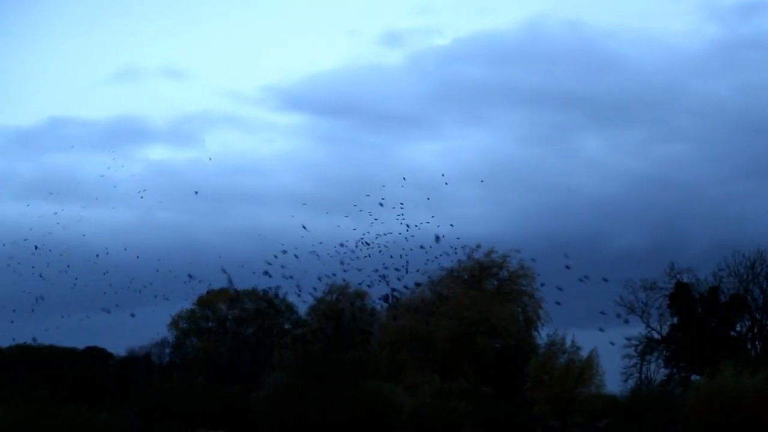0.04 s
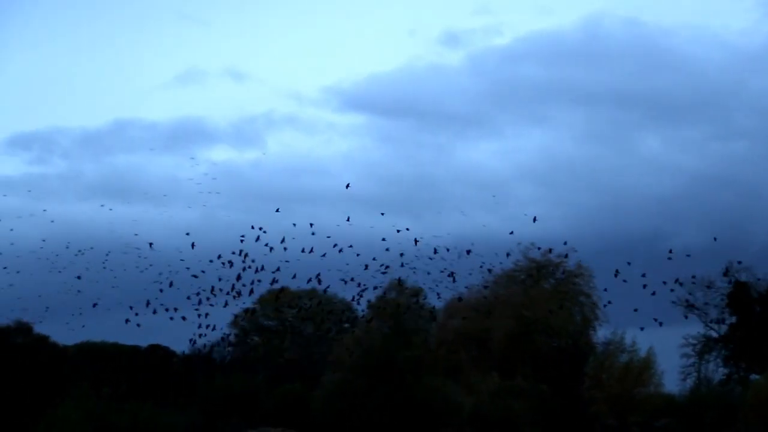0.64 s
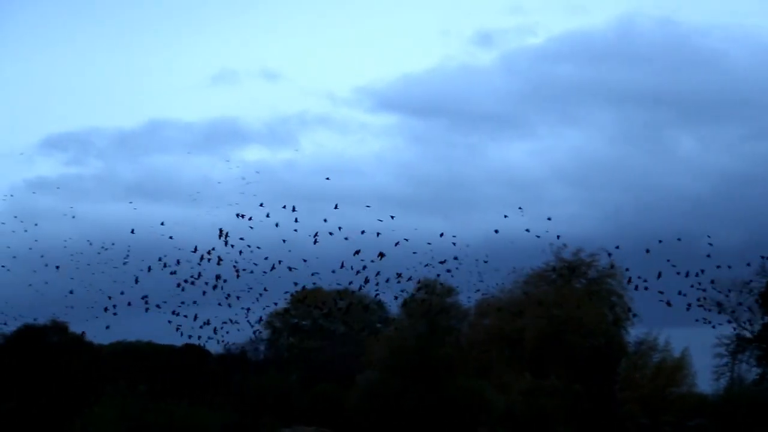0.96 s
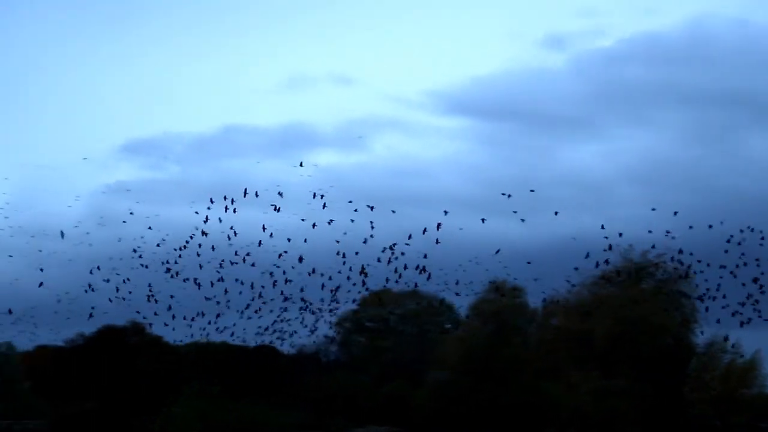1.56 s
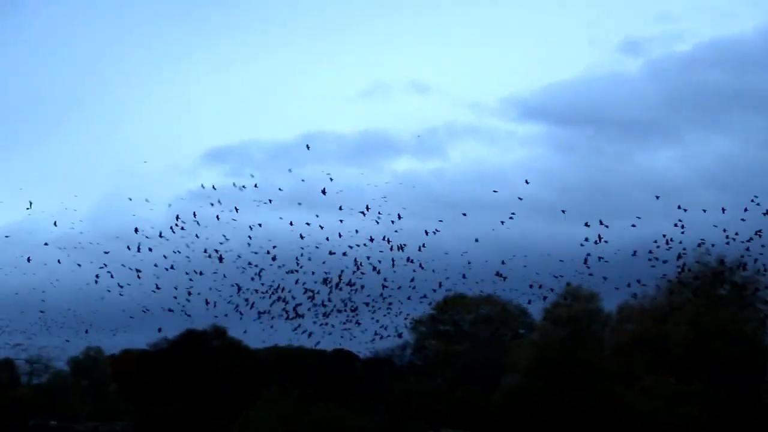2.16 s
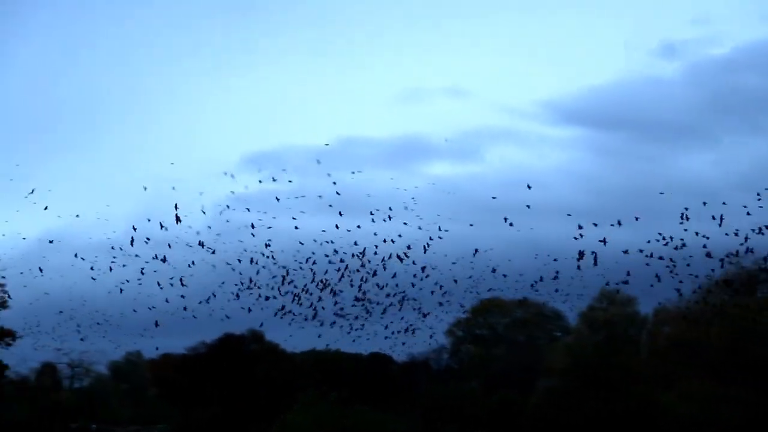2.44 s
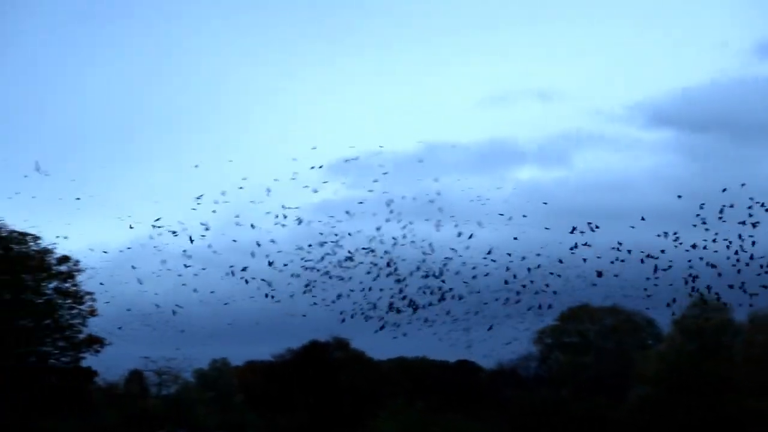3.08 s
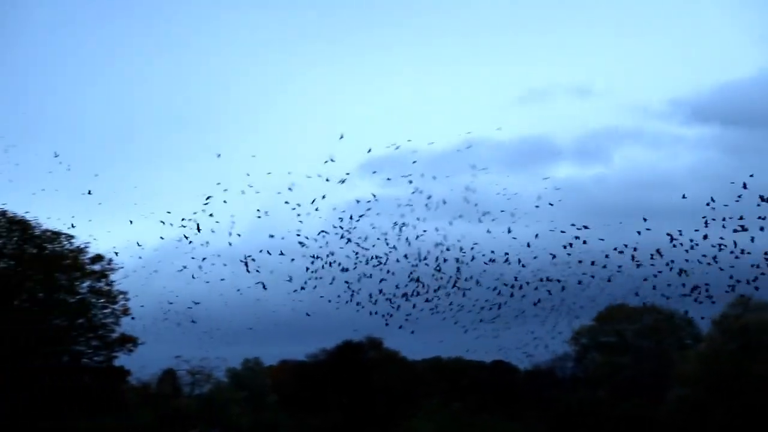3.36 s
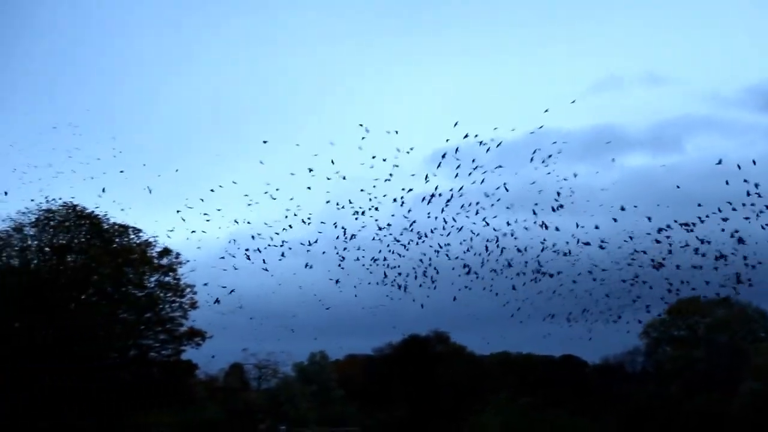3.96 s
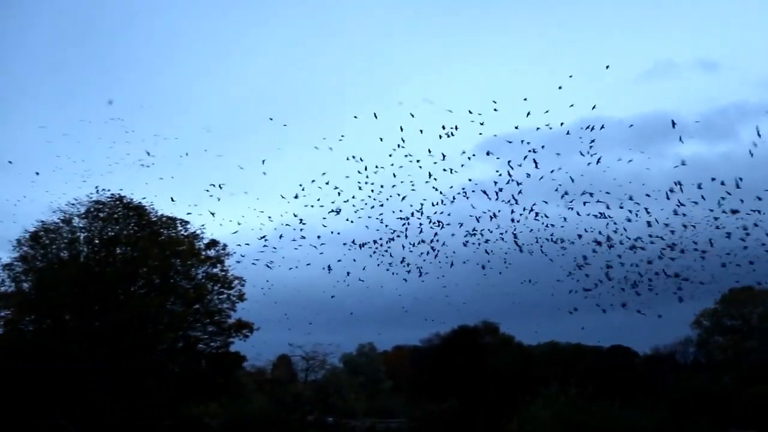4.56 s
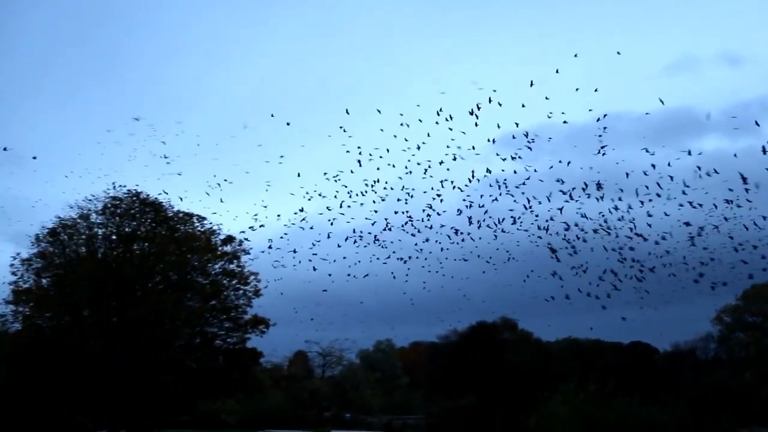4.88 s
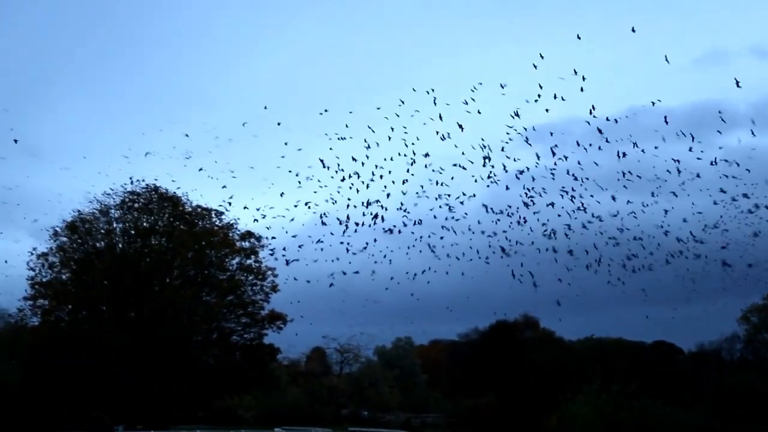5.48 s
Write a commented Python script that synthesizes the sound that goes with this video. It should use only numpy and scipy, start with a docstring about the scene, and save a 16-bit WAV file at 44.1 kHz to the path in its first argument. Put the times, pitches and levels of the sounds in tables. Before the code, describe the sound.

Outdoors, a dense chatter of distant jackdaws runs from start to finish, gently swelling and ebbing. Closer birds cut through with clipped, hoarse 'tchak' calls, several a second, softened by scattering among the trees. A few thin, high chips from a small bird are barely heard. The microphone picks up a steady soft hiss and a light breeze rumble, which turns into irregular low bumps near the end.

```python
"""Jackdaws over trees at dusk

A large flock wheels over the trees, across a field from the microphone. Hundreds of short, falling
'tchak' calls, each a rasping syrinx tone shaped by throat and beak, merge into a chatter; nearer birds
stand out and the trees scatter it all. A small bird chips now and then, and wind bumps the microphone
over a faint hiss."""
import sys
import numpy as np
from scipy import signal
from scipy.fft import rfft, irfft, next_fast_len
from scipy.io import wavfile

SR = 44100
rng = np.random.default_rng(int(sys.argv[2]) if len(sys.argv) > 2 else 0)


def dump_mix(stems):
    """Bounce the given channels to the path in sys.argv[1] as a 16-bit WAV at rate SR."""
    frames = np.atleast_2d(stems).T  # one column per channel
    limited = np.clip(frames, -1, 1)  # hard clip at full scale
    pcm = np.round(limited * 32767).astype(np.int16)
    wavfile.write(sys.argv[1], SR, pcm)


N = 247842

# how the microphone answers wind: f/Hz, gain/dB
WIND_RESPONSE = [(20, -20), (45, -3), (75, 2), (125, 0), (190, -6.5), (280, -20), (500, -32.5), (1200, -63),
                 (4000, -87)]


def undb(db):
    """Decibels to gain."""
    return 10 ** (np.asarray(db) / 20)


def unit(x):
    """Scale to rms 1."""
    return x / np.sqrt(np.mean(x ** 2) + 1e-18)


def add(out, start_s, x):
    """Mix x into out from a given time on."""
    i = int(start_s * SR)
    x = x[max(-i, 0):]
    i = max(i, 0)
    part = out[i:i + len(x)]
    part += x[:len(part)]


def gain_at(hz, points):
    """Gain at given frequencies of a spectrum with rows of f/Hz, gain/dB."""
    f, db = np.transpose(points)
    return undb(np.interp(np.log(np.maximum(hz, 1)), np.log(f), db))


def colour(x, points):
    """Filter by a spectrum with rows of f/Hz, gain/dB."""
    size = next_fast_len(len(x) + 4096)
    hz = np.arange(size // 2 + 1) * SR / size
    return irfft(rfft(x, size) * gain_at(hz, points), size)[:len(x)]


def wander(t, rate_hz):
    """Random values joined by straight lines, rate_hz of them a second."""
    knots = rng.standard_normal(128)
    return np.interp(t * rate_hz, np.arange(len(knots)), knots)


def air(hiss_db=-54.5, whine_db=-85, whine_hz=15660):
    """Steady hiss and blur of the farthest birds, a rumble of breeze, and the camera's thin whine."""
    # spectrum of still air and hiss over the field: f/Hz, relative level/dB
    hiss_spectrum = [(20, -15), (75, -25), (170, -2.5), (280, -6), (450, -9), (750, -7.5), (1100, -5),
                     (1600, 1), (2500, -5), (3100, -15), (5800, -23), (7200, -27), (10000, -31.5),
                     (15500, -36)]
    # rumble of the light breeze between eddies: t/s, level/dB
    breeze = [(0, -67), (.8, -66), (1.3, -63), (2.0, -63.5), (2.4, -67.5), (3.8, -66.5), (4.07, -58),
              (4.35, -72), (4.6, -53), (4.8, -61), (4.92, -53.5), (5.22, -60), (5.42, -56), (5.62, -62.5)]
    t = np.arange(N) / SR
    hiss = colour(rng.standard_normal(N), hiss_spectrum)
    hiss = undb(hiss_db) * unit(colour(hiss, [(150, -1.1), (300, 0.55)]))
    rumble = unit(colour(rng.standard_normal(N), WIND_RESPONSE))
    rumble *= undb(np.interp(t, *np.transpose(breeze)))
    whine = undb(whine_db) * unit(np.sin(2 * np.pi * whine_hz * t))
    return hiss + rumble + whine


def wind(eddy_s=0.015, eddy_db=-43.5, halving_db=10, wake_db=-14, wake_s=0.036):
    """Each eddy is a burst of turbulent pressure with a weak wake; faster ones hit harder."""
    # strong eddies striking the microphone: t/s, level/dB
    eddies = [(1.29, -55), (1.329, -53.5), (1.91, -51.5), (1.993, -55.5), (3.98, -48), (4.059, -40.5),
              (4.151, -46), (4.19, -46.5), (4.501, -40.5), (4.518, -39.5), (4.59, -47.5), (4.636, -44),
              (4.763, -34), (4.926, -36.5), (4.965, -46), (5.13, -47), (5.335, -51.5), (5.469, -33),
              (5.506, -42.5)]
    out = np.zeros(N)
    t = np.arange(-SR // 10, SR // 5) / SR
    for s, db in eddies:
        length_s = eddy_s * .5 ** ((db - eddy_db) / halving_db)  # a harder eddy passes sooner
        reach = (eddy_s / length_s) ** 0.27  # and its spectrum reaches higher
        spectrum = [(hz * reach, gain_db) for hz, gain_db in WIND_RESPONSE]
        burst = np.exp(-2 * (t / length_s) ** 2)
        wake = undb(wake_db) * (t > 0) * np.exp(-abs(t) / wake_s)
        puff = colour((burst + wake) * rng.standard_normal(len(t)), spectrum)
        puff *= np.sqrt(length_s * SR / np.sum(puff ** 2))
        add(out, s + t[0], undb(db) * puff)
    return out


def trees(x, wet_db, t60_s, echoes=40):
    """Trunks and crowns add single echoes and a diffuse tail to the direct sound."""
    t = np.arange(SR) / SR
    response = rng.standard_normal(SR)
    echo_delays_s = rng.uniform(.006, .12, echoes)
    response[(SR * echo_delays_s).astype(int)] += 5 * rng.standard_normal(echoes)
    response *= undb(-60 * t / t60_s) * (1 - np.exp(-t / 0.015))
    response = colour(unit(response) / np.sqrt(SR), [(2500, 0.6), (6000, 1.4), (12000, 5.1)])
    return x + undb(wet_db) * signal.fftconvolve(x, response)[:len(x)]


def small_bird(octave_db=-25):
    """Thin, nearly pure chips that slide and level off."""
    # chips among the trees: t/s, length/s, start f/Hz, end f/Hz, direct level/dB
    chips = [(2.105, 0.019, 5100, 5400, -58.5), (2.23, 0.035, 4780, 5360, -59),
             (4.704, 0.033, 5330, 5200, -65.5), (4.731, 0.029, 5380, 5320, -61.5)]
    out = np.zeros(N)
    for s, length_s, start_hz, end_hz, db in chips:
        progress = np.linspace(0, 1, int(length_s * SR))
        hz = end_hz + (start_hz - end_hz) * (1 - progress) ** 2
        phase = 2 * np.pi * np.cumsum(hz) / SR
        tone = np.sin(phase) + undb(octave_db) * np.sin(2 * phase)
        add(out, s, undb(db) * unit(np.sin(np.pi * progress) * tone))
    return trees(out, wet_db=-8, t60_s=0.28)


def tchak(length_s, start_hz, end_hz, beak_hz, beak_db, rasp, jitter=0.066, flutter=0.95, hoarse_db=-5):
    """The pitch flicks up, then falls ever faster; an unsteady syrinx and turbulence make it rasp."""
    # response of a jackdaw's throat and beak: f/Hz, gain/dB
    throat = [(500, -36), (850, 3), (1080, 1.5), (1500, -1), (1900, 7.5), (2300, 7.5), (2730, -2),
              (3050, -9.5), (4400, -11), (5500, -12.5), (6300, -17), (7200, -22), (8400, -19.5),
              (9200, -27.5), (15000, -52)]
    t = np.arange(int(length_s * SR)) / SR
    progress = t / length_s
    fall_hz = start_hz + (end_hz - start_hz) * progress ** 1.247
    hz = fall_hz * (1 - 0.091 * np.exp(-t / 0.0026))  # the opening flick
    unsteady_hz = hz * (1 + jitter * rasp * wander(t, rate_hz=900))
    phase = 2 * np.pi * np.cumsum(unsteady_hz) / SR
    # the open beak lifts whichever harmonic lies near its resonance
    grid_hz = np.geomspace(400, 16000, 90)
    lift_db = beak_db * np.exp(-(np.log(grid_hz / beak_hz) / 0.24) ** 2)
    tract = np.column_stack([grid_hz, 20 * np.log10(gain_at(grid_hz, throat)) + lift_db])
    harmonics = np.arange(1, 11)[:, None]
    tone = np.sum(gain_at(harmonics * hz, tract) * np.sin(harmonics * phase), axis=0)
    # turbulence comes once a cycle and passes through the same tract
    hoarse = colour(rng.standard_normal(len(t)) * (1 + np.cos(phase)), tract)
    swell = np.sqrt(np.sin(np.pi * progress)) * np.exp(-progress)
    swell *= 1 + flutter * rasp * wander(t, rate_hz=501)
    return unit(swell * (unit(tone) + rasp * undb(hoarse_db) * unit(hoarse)))


def call(pitch_hz, beak_hz, beak_db, rasp, clear_s=0.0292, harsh_s=0.0531, relaxed_hz=826, sag=.56):
    """One bird's call: harshness draws it out; its pitch sags partway to that of the relaxed syrinx."""
    length_s = clear_s + (harsh_s - clear_s) * rasp
    end_hz = pitch_hz + sag * (relaxed_hz - pitch_hz)
    return tchak(length_s, pitch_hz, end_hz, beak_hz, beak_db, rasp)


def far_flock(pitch_hz=1300, pitch_spread=.13, spread_db=3.5, calls=1000, birds=240):
    """Far voices, each with its own pitch, fall and beak opening, call at random from many distances."""
    voices = []
    for _ in range(birds):
        duration, fall, rough, gape = rng.random(4)
        length_s = 0.02378 + 0.02367 * duration
        start_hz = pitch_hz * np.exp(pitch_spread * np.clip(rng.standard_normal(), -2.5, 1.4))
        end_hz = start_hz * (.88 - 0.2032 * fall)
        beak_hz = 1500 * 4 ** gape
        voices.append(tchak(length_s, start_hz, end_hz, beak_hz, beak_db=3, rasp=0.89 * rough))
    out = np.zeros(N + SR)  # the flock is already calling a second earlier
    times = (np.arange(calls) + rng.uniform(-2, 2, calls)) / calls * len(out) / SR
    for s, bird, nearness in zip(times, rng.integers(0, birds, calls), rng.standard_normal(calls)):
        add(out, s, undb(spread_db * min(nearness, 1)) * voices[bird])
    return trees(out, wet_db=-6, t60_s=1.0)[SR:]


def chatter(trim_db=-0.5):
    """The far flock's chatter swells and ebbs, dull at the top."""
    # loudness of the whole flock: t/s, level/dB before the trim
    loudness = [(0, -51.5), (.6, -50.5), (.72, -53.5), (.92, -49), (1.35, -54), (1.52, -50.5), (1.9, -52.5),
                (2.5, -50), (2.85, -51.5), (3.3, -50.5), (3.7, -50), (4.1, -52.5), (4.9, -52),
                (5.15, -50.5), (5.48, -49), (5.62, -56.5)]
    # tone colour of the distant chatter: f/Hz, gain/dB
    flock_colour = [(850, -2.5), (1080, 4.5), (1320, -2), (1620, 5), (2000, 3.5),
                    (2700, 2.5), (3000, -4), (4000, -3), (6000, 1), (9000, -14)]
    level_db = np.interp(np.arange(N) / SR, *np.transpose(loudness)) + trim_db
    return undb(level_db) * unit(colour(far_flock(), flock_colour))


def passing_jackdaws(pitch_hz=1323, pitch_spread=0.121, loudest_db=-54.5, calls=44):
    """At middle distance a few calls a second just clear the chatter; a wider beak sounds thinner."""
    beak_low_hz, beak_high_hz = 2200, 5800
    thinning_db, distance_db = -9, -4
    out = np.zeros(N)
    for slot, (when, pitch, nearness, gape, rough) in enumerate(rng.random((calls, 5))):
        hz = pitch_hz * np.exp(pitch_spread * (2 * pitch - 1))
        beak_hz = beak_low_hz * (beak_high_hz / beak_low_hz) ** gape
        voice = call(hz, beak_hz, beak_db=14, rasp=0.477 * rough)
        db = loudest_db + thinning_db * gape + distance_db * (1 - nearness)
        add(out, (slot + when) / calls * N / SR, undb(db) * voice)
    return trees(out, wet_db=-1, t60_s=0.6)


def near_jackdaws(trim_db=-0.5):
    """Single birds close enough to the microphone to be picked out."""
    # nearest calls: t/s, pitch f/Hz, level/dB before the trim, beak resonance f/Hz, its lift/dB, rasp/0-1
    near_calls = [ (0.0, 932, -49, 7500, 0, 0.69), (.283, 1415, -53, 2700, 9, .5),
                  (.545, 1267, -51, 5200, 3, 0.28), (.561, 1236, -53.5, 6040, 10.5, 0.84),
                  (.6, 1121, -51.5, 2200, 10, 0.93), (.702, 1406, -58.5, 2600, 18, .1),
                  (.875, 1092, -55, 4000, 11, 0.45), (.923, 947, -51.5, 3800, 3, 0.6),
                  (1.07, 1220, -59, 5900, 12, 0.83), (1.184, 1150, -53.5, 4150, 10, 0.5),
                  (1.49, 1402, -52.5, 2500, 8, 0.12), (1.68, 909, -56.5, 900, 2, .4),
                  (1.752, 1137, -59.5, 4280, 17, 0.56), (1.966, 1347, -52, 4000, 3, 0.45),
                  (2.076, 1207, -55, 4780, 14, 0.06), (2.098, 1247, -51.5, 7040, 11, 0.3),
                  (2.211, 1283, -53, 2170, 4, 0.01), (2.422, 1304, -54, 4200, 6, 0.27),
                  (2.915, 1258, -54, 2200, 13, 0.15), (2.94, 1467, -58, 5500, 9, 0.38),
                  (2.96, 1408, -55, 5780, 13, .9), (3.01, 1483, -53, 5350, 9.5, 0.32),
                  (3.068, 1430, -50, 2730, 8, .25), (3.283, 1302, -50.5, 5160, 4.5, .6),
                  (3.387, 930, -49.5, 1650, 16, 0), (3.456, 1460, -58, 4370, 8, 0.45),
                  (3.532, 1470, -52.5, 4100, 5, .35), (3.551, 1095, -52, 8160, -2, 0.62),
                  (3.597, 1487, -50.5, 3360, 11, 0.04), (3.628, 1050, -51.5, 1030, 11, 0.5),
                  (3.674, 1016, -49, 1005, 9, 0.57), (3.969, 1339, -56.5, 3530, 7, .15),
                  (4.067, 1568, -62, 6440, 21, 0.54), (4.386, 1275, -56.5, 5500, 21, 0.2),
                  (4.412, 1264, -55.5, 5440, 13, 0.68), (4.467, 1260, -56, 5370, 17, 0.35),
                  (4.491, 1428, -55, 4230, 6, 0.52), (4.552, 1158, -53.5, 4400, 5, 0.96),
                  (4.726, 1384, -50, 2520, 9, 0.27), (4.753, 1311, -55, 6530, 13.5, 0.88),
                  (4.822, 1534, -58.5, 5680, 14, 0.37), (4.897, 1487, -62, 5680, 13, 0.34),
                  (5.039, 1093, -56.5, 4150, 15.5, 0.34), (5.27, 1322, -51, 2360, 15, .3)]
    out = np.zeros(N)
    for s, pitch_hz, db, beak_hz, beak_db, rasp in near_calls:
        add(out, s, undb(db + trim_db) * call(pitch_hz, beak_hz, beak_db, rasp))
    return trees(out, wet_db=-4.5, t60_s=0.24)


def scene():
    """Birds, wind and air at one microphone across the field from the trees."""
    return (chatter() + near_jackdaws() + passing_jackdaws() + small_bird() + wind() + air())[None]


def record(dry):
    """The top treble ends steeply above about 15.7 kHz."""
    cutoff_hz = 15690
    return signal.sosfilt(signal.ellip(10, .1, 70, cutoff_hz, fs=SR, output="sos"), dry)


dry = scene()
out = record(dry)
dump_mix(out)
```